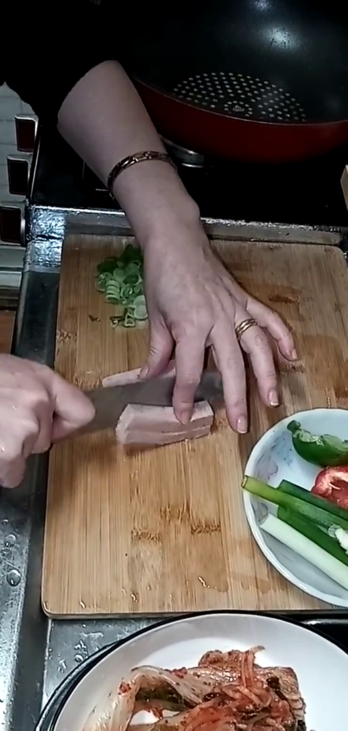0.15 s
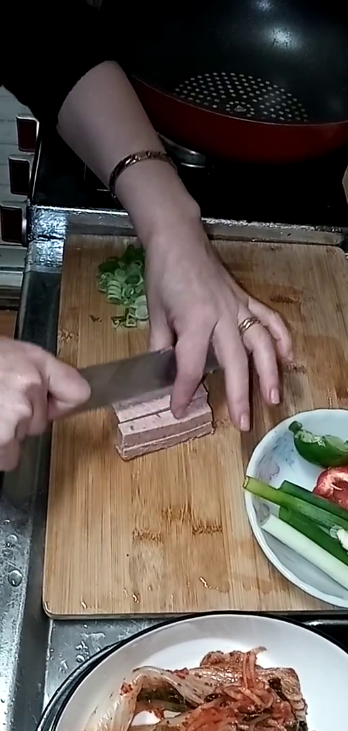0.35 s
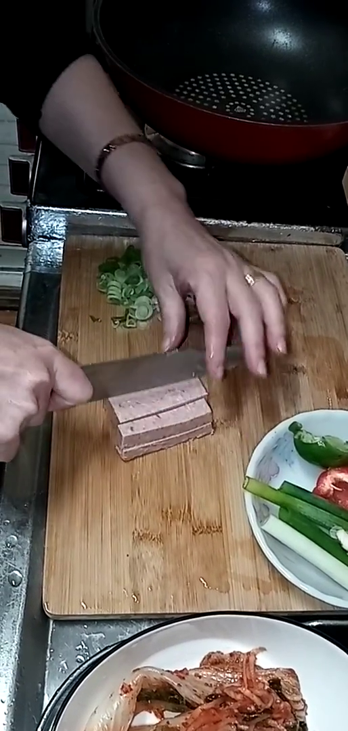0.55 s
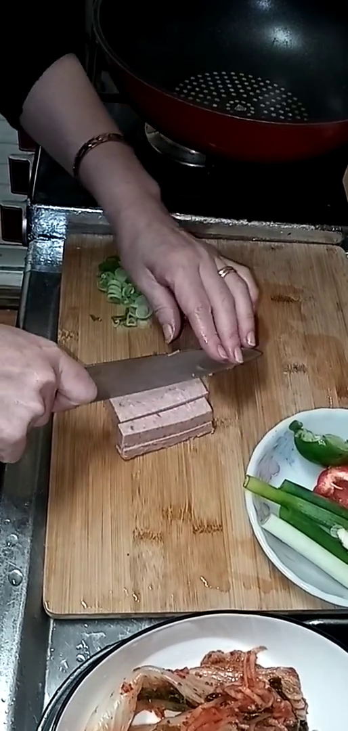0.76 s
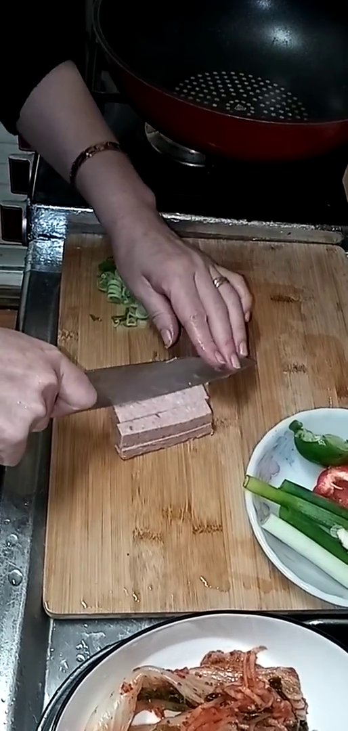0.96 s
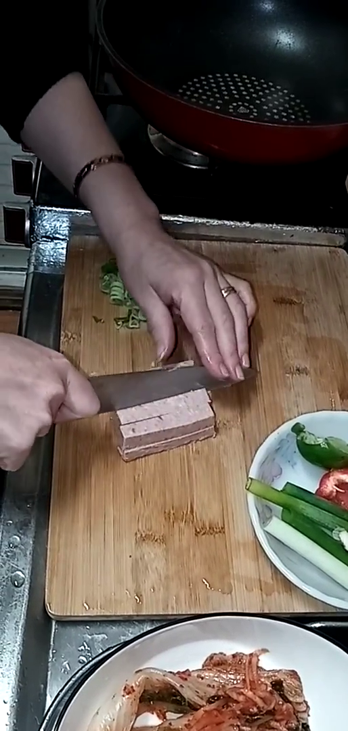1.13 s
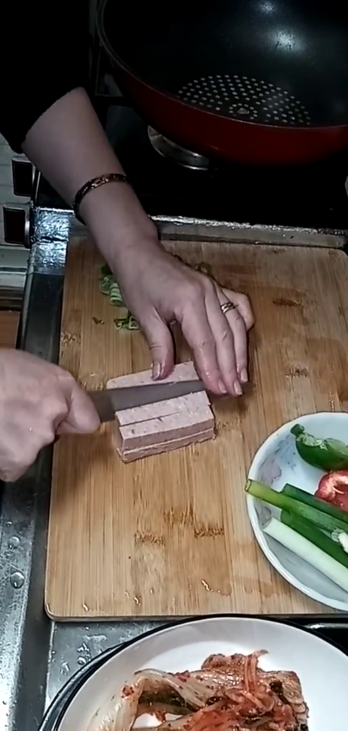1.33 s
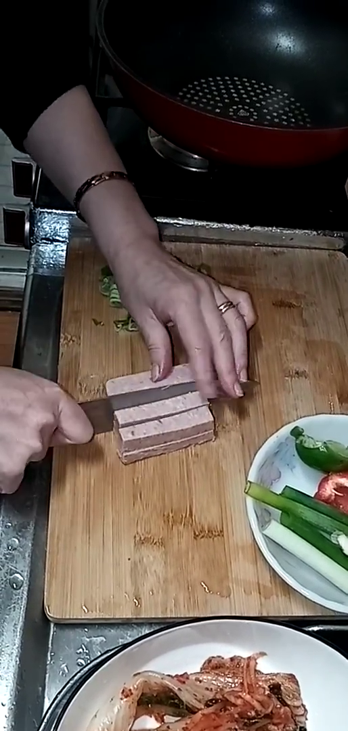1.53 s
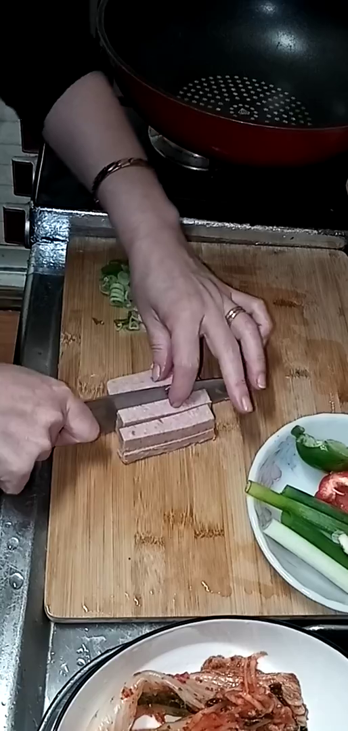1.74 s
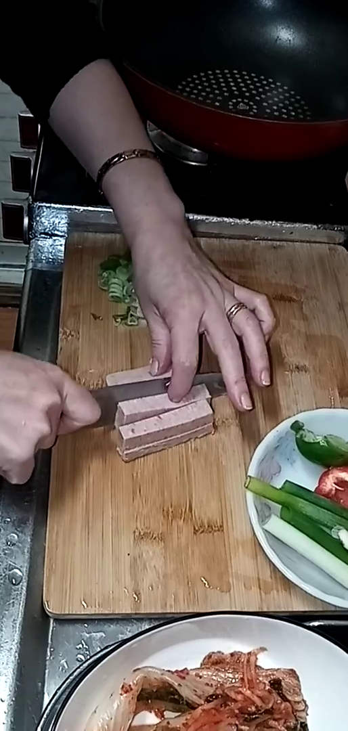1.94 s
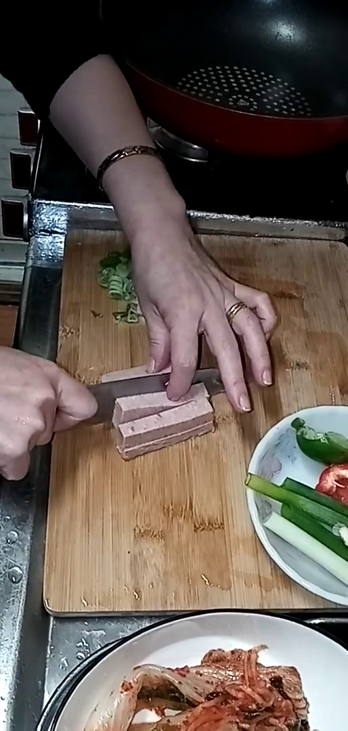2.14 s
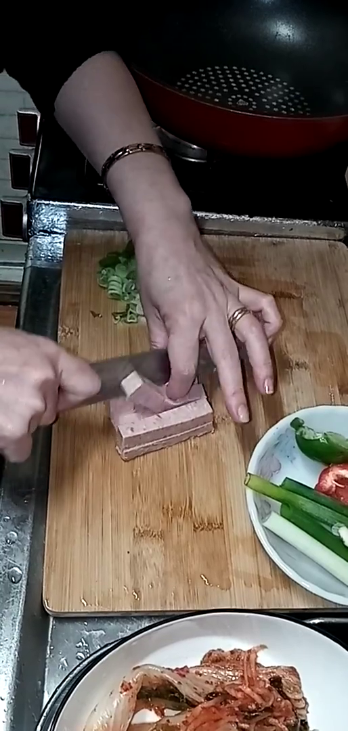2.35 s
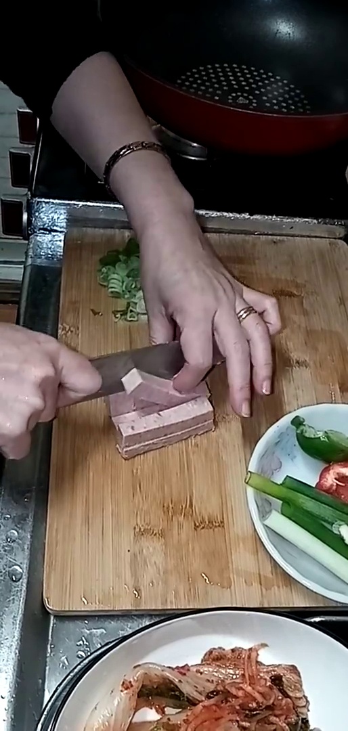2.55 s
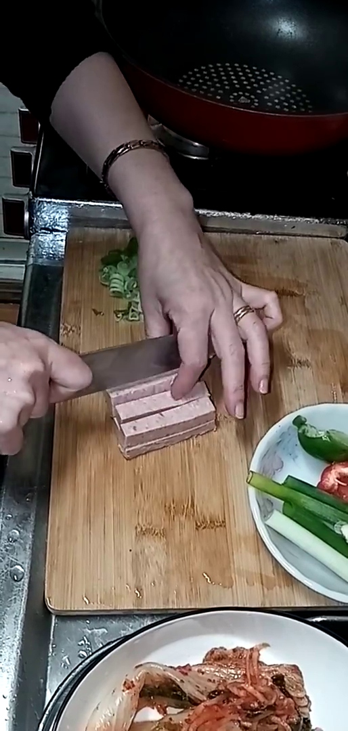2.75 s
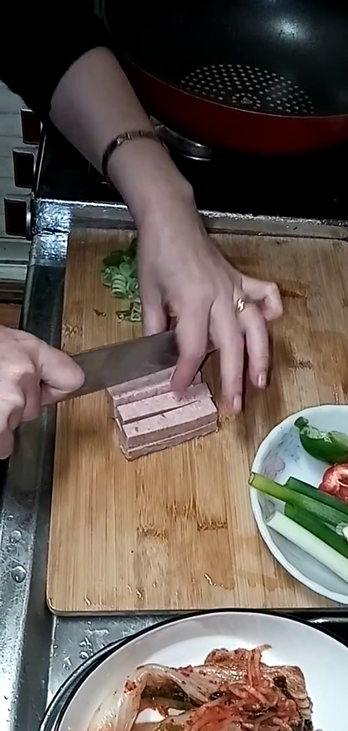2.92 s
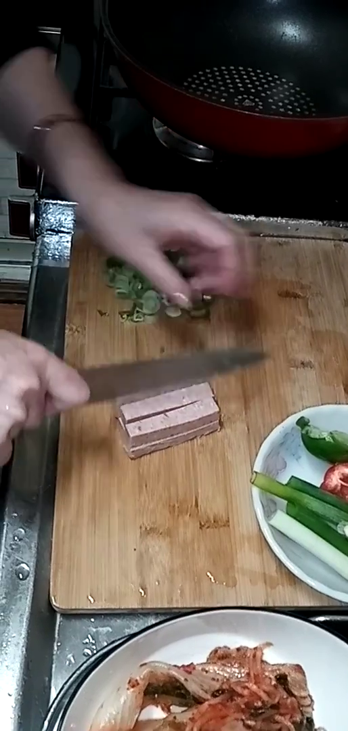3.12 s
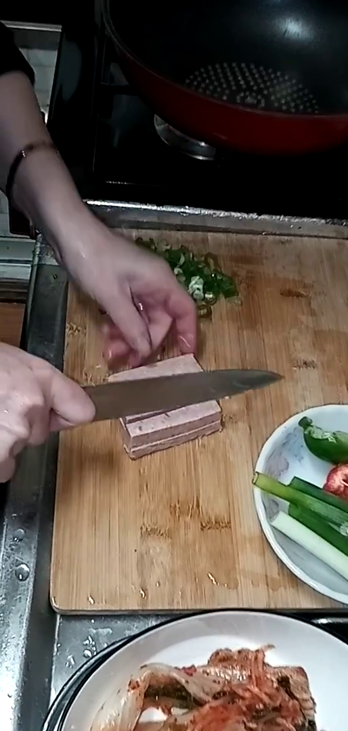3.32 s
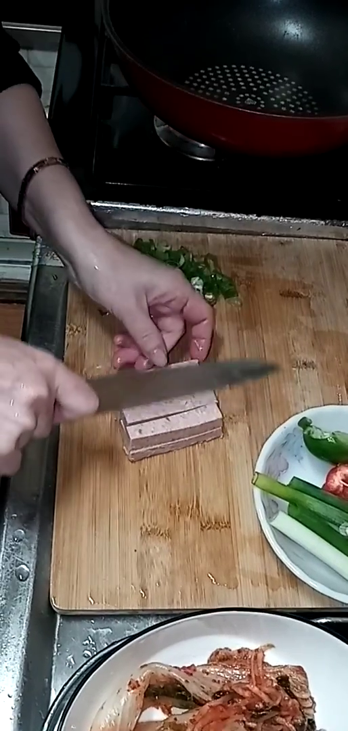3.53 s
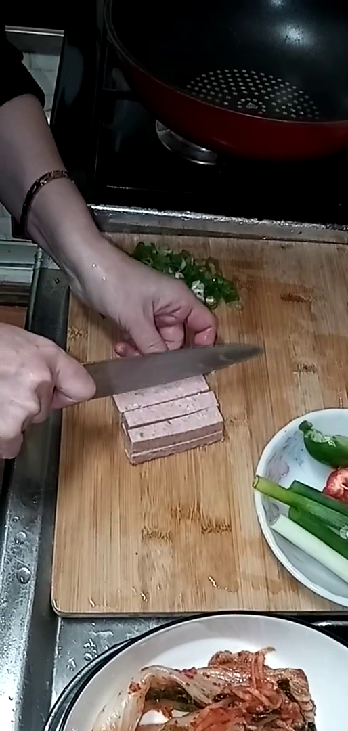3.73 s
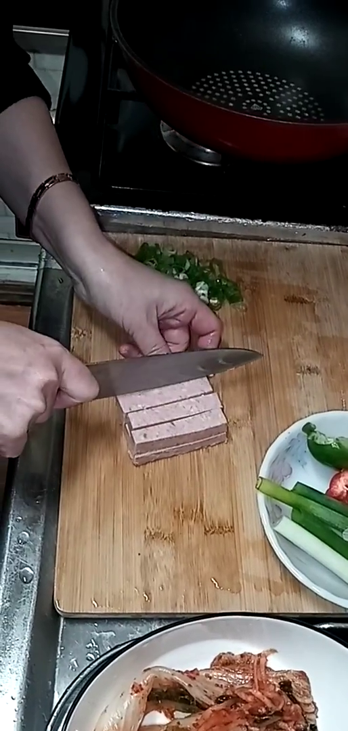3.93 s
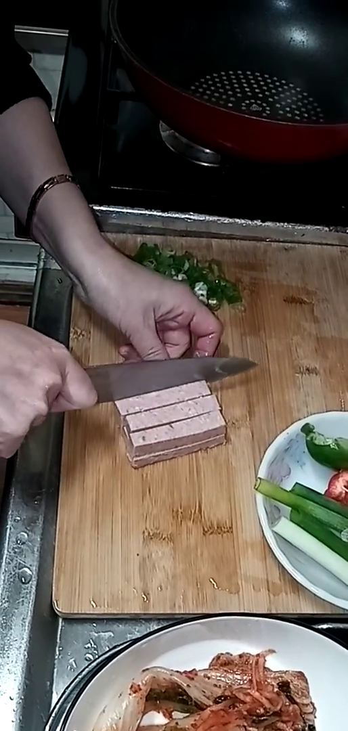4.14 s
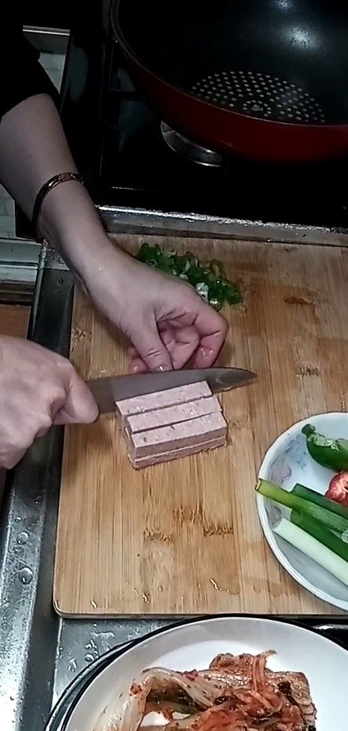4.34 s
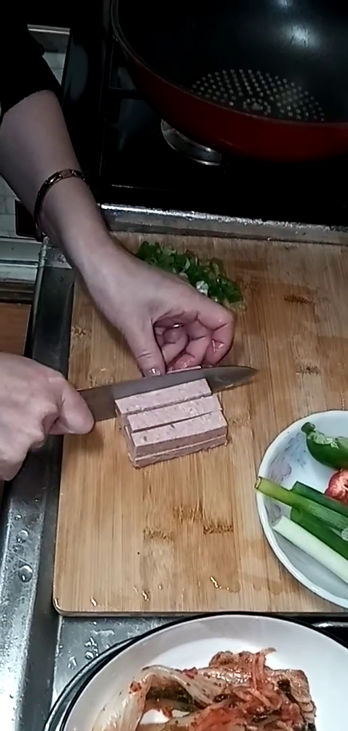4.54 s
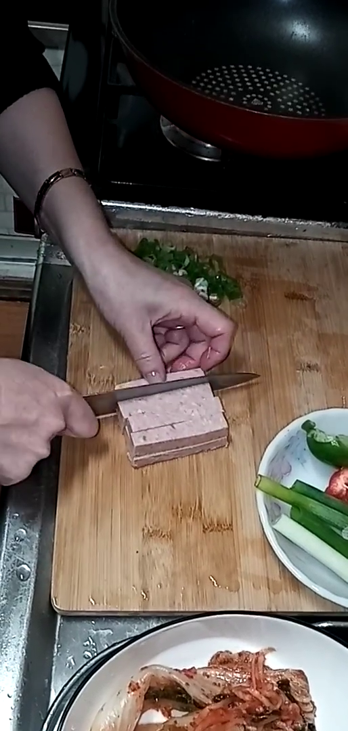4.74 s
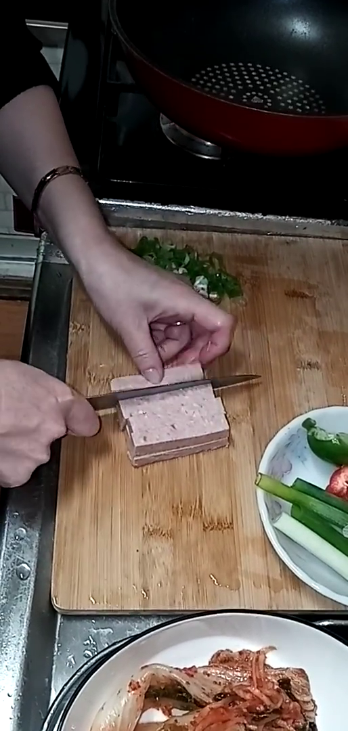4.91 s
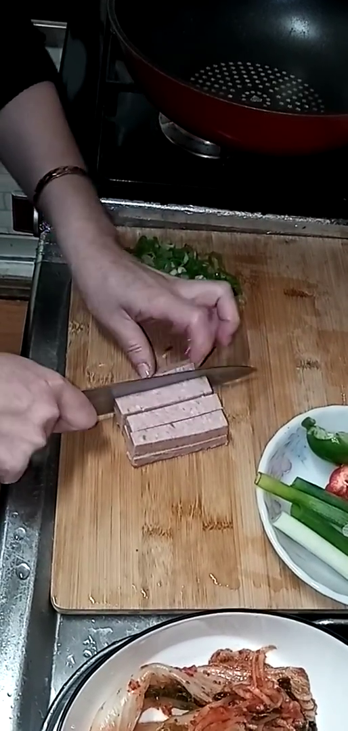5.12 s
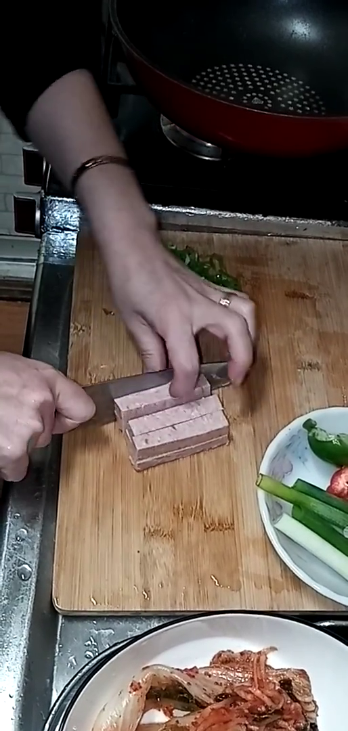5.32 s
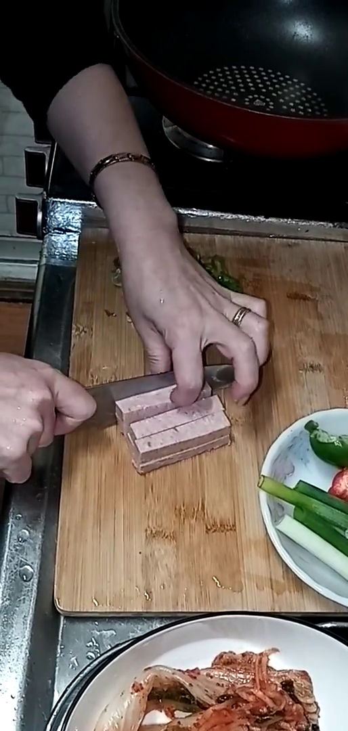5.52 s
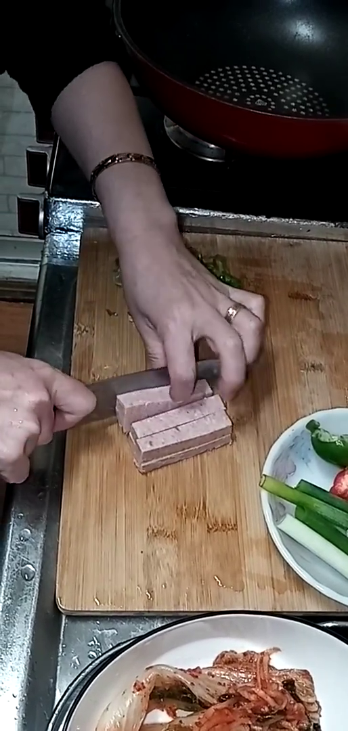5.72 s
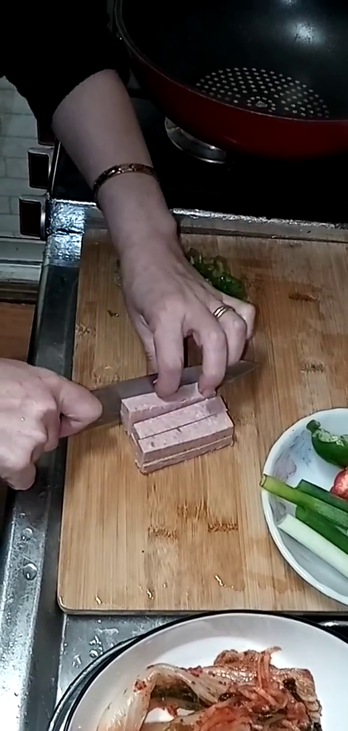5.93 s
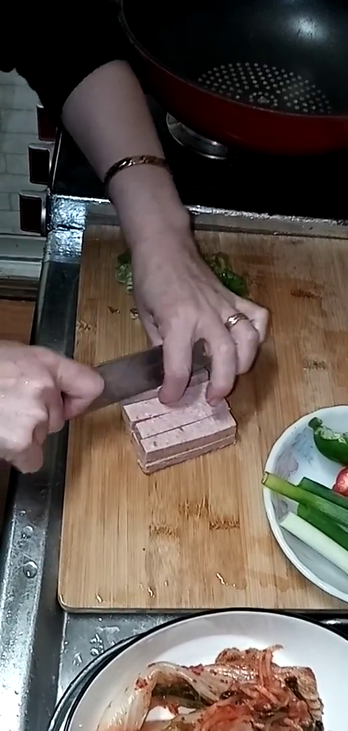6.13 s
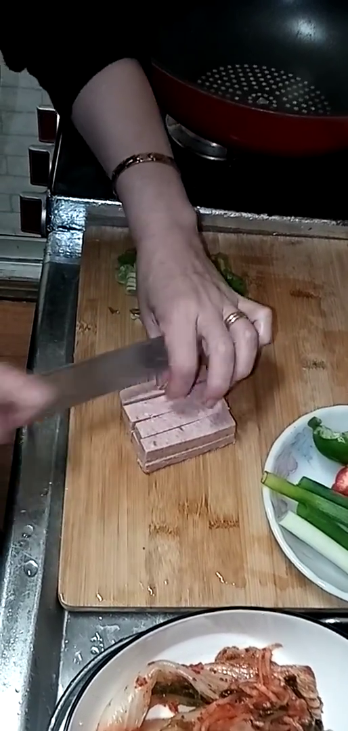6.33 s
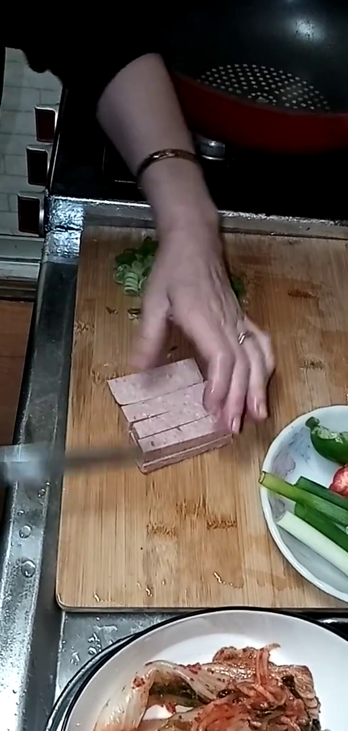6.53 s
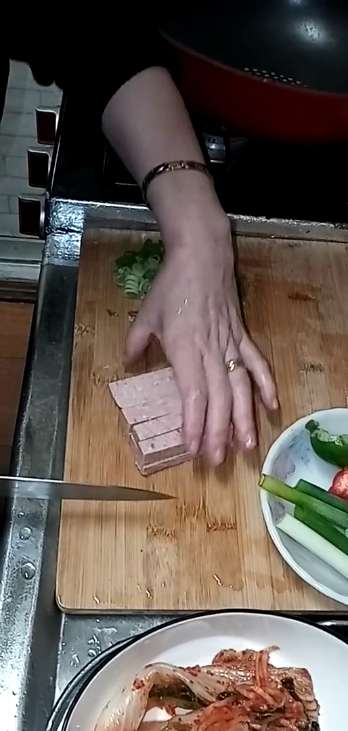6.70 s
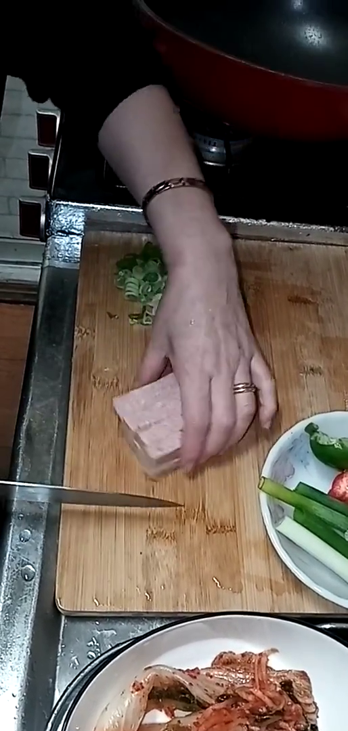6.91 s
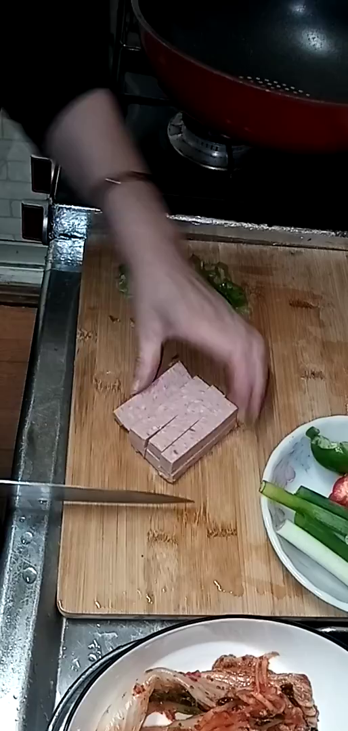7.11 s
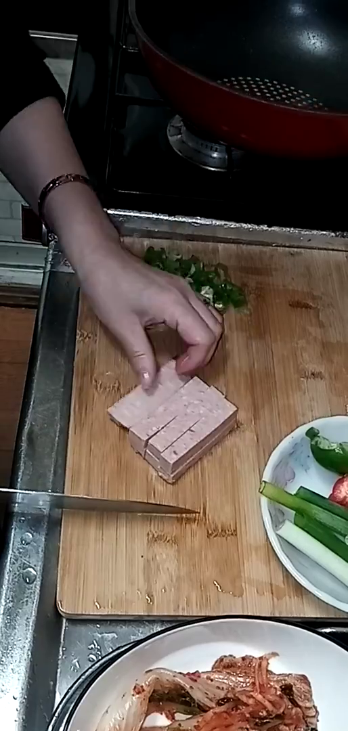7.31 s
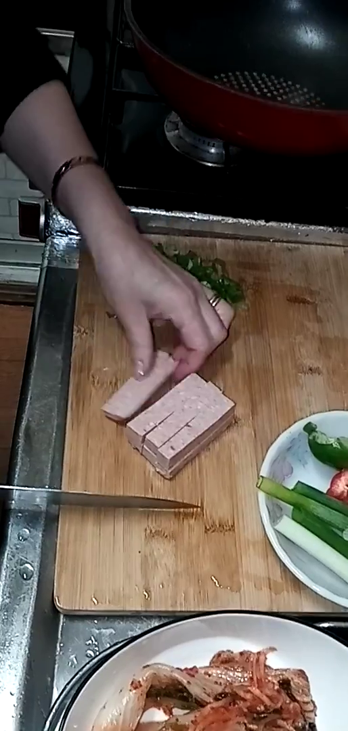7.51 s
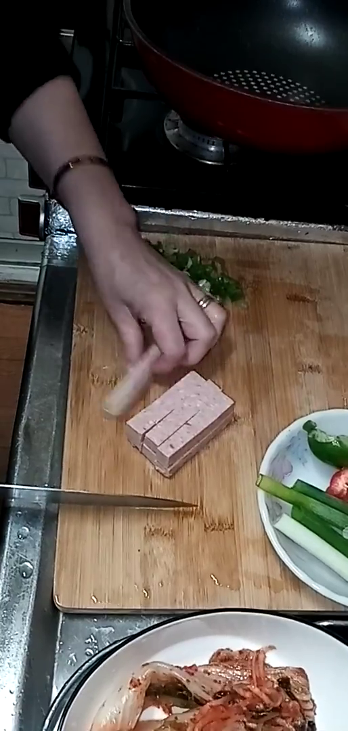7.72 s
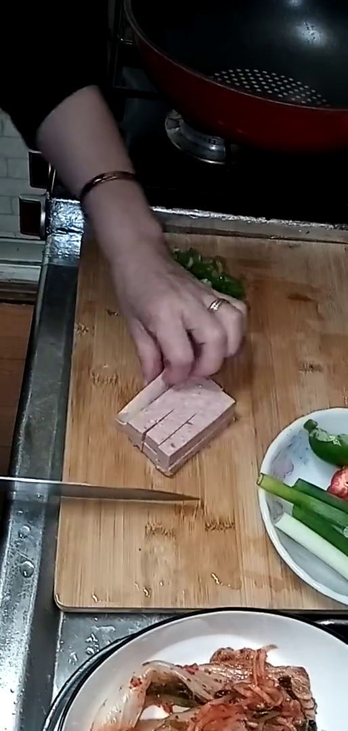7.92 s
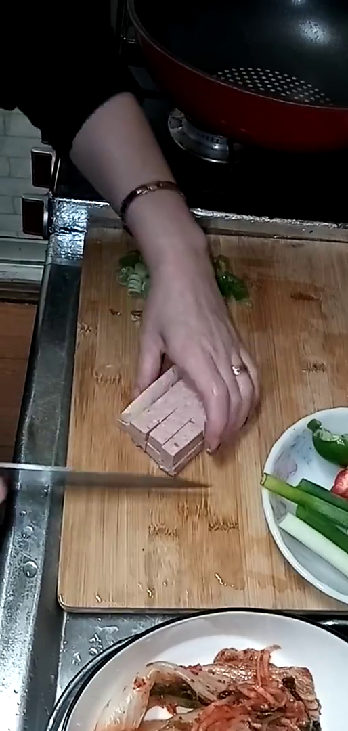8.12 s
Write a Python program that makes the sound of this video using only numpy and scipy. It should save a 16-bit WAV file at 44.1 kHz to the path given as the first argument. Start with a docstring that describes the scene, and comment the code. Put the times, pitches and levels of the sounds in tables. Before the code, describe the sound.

Close in a quiet kitchen, a knife cuts soft meat on a wooden board. Faint thuds and tiny wet clicks lead to a firm knock on wood, a wet snap and another double knock. Later the steel counter is tapped and scraped, the blade rings briefly as it is laid down, and three harder knocks finish. Low background noise, short room tail, a nearby phone microphone.

```python
"""A knife cuts ham on a wooden board on a steel counter in a quiet kitchen, a phone microphone nearby.
Soft meat thuds and faint wet clicks (filtered crackle) come first, over a bed of shaped noise.
Then the blade knocks on the wood (struck modes), wet meat snaps off it, and leaning hands rumble the counter.
Late on, steel is tapped and scraped (slips ringing its modes), the blade rings as it drops flat,
and the hardest knocks end the scene."""
import sys
import numpy as np
from scipy import signal
from scipy.fft import rfft, irfft
from scipy.io import wavfile
from scipy.ndimage import uniform_filter1d

SR = 44100
rng = np.random.default_rng(int(sys.argv[2]) if len(sys.argv) > 2 else 0)


def wav_record(signal):
    """Record a signal, one row per channel, as 16-bit PCM in the file named by sys.argv[1]."""
    frames = np.transpose(np.atleast_2d(signal))
    bounded = np.clip(frames, -1, 1)
    # unit amplitude maps onto the largest positive 16-bit level
    quanta = np.round(bounded * 32767).astype(np.int16)
    wavfile.write(sys.argv[1], SR, quanta)


def volts_from_db(level):
    """Convert decibel levels to linear amplitude ratios."""
    exponent = np.asarray(level, float) / 20
    return 10 ** exponent


N = 364266  # length in samples

# blade on wood: start_s, level_db (9 dB over the rms of the first 11 ms),
# then the modes near 300, 600, 1300 and 2000 Hz against those near 950 Hz: low_db, mid_db, high_db, top_db
KNOCKS = [(1.46, -19.5, 2.5, -2, 1, 4), (1.471, -29.5, -7, 11, -5, 1), (2.766, -50, -5, 14, -13, -15),
          (4.368, -53.5, -10, -9, -7, 19), (4.434, -21, 6.5, -2.5, -9, 1), (4.444, -23.5, 3.5, 13.5, 9, -7),
          (4.573, -42.5, -14, 1, 4, -21), (4.597, -52.5, -25, -3, 10, -7),
          (5.429, -31.5, 6.5, -4, -19, -40), (5.443, -34, 11.5, -0.5, -13, -40),
          (7.272, -14.5, 1.5, -7.5, 1, 5.5), (8.007, -18.5, 4.5, -1.5, 1, 1.5),
          (8.232, -10.5, -3, -5.5, 8, 6)]
# centres of those four mode groups, then of the reference group: centre_hz
KNOCK_HZ = [300, 600, 1300, 2000, 950]
# modes of the board: pitch_hz, relative level_db, t60_s (10 ms at least when struck)
BOARD = [(246, -17, 0.099), (456.9, -14, 0.25), (528, -7.5, 0.17), (651, -0.5, 0.12), (728.5, -11, 0.13),
         (861, 4.5, 0.032), (970.6, 1, 0.04), (1136, -0.5, 0.025), (1232, -5.5, 0.084), (1272, 4, 0.037),
         (1625, -9, 0.048), (1758, 5.5, 0.0081), (2065, -5.5, 0.027), (2797, -28.5, 0.031)]
DETUNE = 0.015  # the pressing hand shifts the modes from blow to blow, as a fraction of pitch
SINK_S = 0.0017  # decay of the contacts as the edge seats itself
SOFT_S = 0.0003  # rise of a 0 dB blow; weaker blows are cushioned by the meat and rise slower


def knocks():
    """The edge seats itself in the wood in a few quick contacts, too softly to excite the treble."""
    out, t = np.zeros(N), np.arange(900) / SR
    for start_s, level_db, *colour_db in KNOCKS:
        modes = thick(BOARD, -1.9, count=36)
        place_db = 2 * rng.standard_normal(len(modes))  # every spot of the board favours other modes
        modes[:, 0] *= 1 + DETUNE * rng.uniform(-1.13, 1, len(modes))
        contacts = 0.035 * rng.standard_normal(len(t)) ** 3 * np.exp(-t / SINK_S)
        contacts[[0, 50]] = 0.3, 3  # a touch, then the firm blow
        body = ring(modes, colour(modes, KNOCK_HZ, colour_db) + place_db)
        rise_s = SOFT_S * volts_from_db(-level_db / 2)
        body *= 1 - np.exp(-np.arange(len(body)) / SR / rise_s)
        knock = signal.fftconvolve(contacts, body)
        add(out, start_s, volts_from_db(level_db) * knock / np.sqrt(8 * np.mean(knock[:500] ** 2)))
    return band(out, 120, 2730, order=4)


# modes of the steel counter top, tapped and dragged on: pitch_hz, relative level_db, t60_s
STEEL = [(624.8, 1, 0.15), (712, -2.5, 0.06), (984, 2.5, 0.066), (1080, -4, 0.078), (1493, -10, 0.052),
         (1745, -10, 0.071), (1958, -6, 0.051), (2060, -6, 0.048), (2507, -20, 0.16), (3337, -24.5, 0.042)]
# taps on steel: start_s, level_db (rms of the first 20 ms),
# then the modes near 620, 2000 and 3000 Hz against those near 1000 Hz: low_db, high_db, top_db,
# and the treble hiss against the modes: sheen_db
TAPS = [(1.556, -47.5, 5.5, 11.5, 0.5, -27), (6.564, -51, -20, -15, -11, -19),
        (6.644, -30, 3, -8, -10, -34), (6.815, -35, -5.5, -11, -4, -25.5), (6.833, -31.5, 2.5, 5, -3, -36),
        (7.047, -35, -1.5, 2, 12, -20), (7.719, -36.5, 2, 13.5, 17, -5.5), (7.728, -41, -4, 14, 11, -5.5)]
# centres of those three mode groups, then of the reference group: centre_hz
TAP_HZ = [620, 2000, 3000, 1000]
CONTACT_S = 0.006  # decay of the contacts in one tap


def taps():
    """Each tap is a short cluster of contacts that rings the steel."""
    out, t = np.zeros(N), np.arange(2000) / SR
    for start_s, level_db, *colour_db, sheen_db in TAPS:
        modes = thick(STEEL, -1.3, count=30)
        modes[:, 0] *= 1 + DETUNE * rng.uniform(-0.81, 1, len(modes))
        body = band(ring(modes, colour(modes, TAP_HZ, colour_db)), 457, 3500, order=3)
        add(body, 0, volts_from_db(sheen_db) * np.linalg.norm(body) * sheen())
        contacts = rng.standard_normal(len(t)) ** 3 * np.exp(-t / CONTACT_S)
        contacts[0] = 32  # the first contact is firm
        tap = signal.fftconvolve(contacts, body)
        add(out, start_s, volts_from_db(level_db) * tap / np.sqrt(np.mean(tap[:900] ** 2)))
    return out


# dragging and chatter on steel, one curve a stroke: time_s, ring_db, rasp_db,
# low_db (modes up to 700 Hz against those from 950 Hz up)
DRAG = [
    [(6.574, -34, -54, -2), (6.6, -37, -48, -1), (6.628, -31, -45, -15), (6.66, -48, -56, -2.5),
     (6.72, -42, -50.5, 2), (6.75, -45, -57, -11), (6.81, -43.5, -54, -4), (6.87, -54.5, -90, 0.5),
     (6.95, -74, -98, 3)],
    [(7.055, -39.5, -75, -6.5), (7.11, -51, -57, -5.5), (7.18, -48, -59, -1.5), (7.27, -55.5, -72, -3),
     (7.34, -52, -76, 0), (7.4, -55, -69, 3), (7.58, -65, -78, 12), (7.65, -98, -97, 0)],
    [(8.03, -67, -96, 5), (8.1, -51, -80, -8), (8.16, -62, -68.5, -13), (8.21, -61, -99, 1)],
]
# one thin line of the blade sings along in each stroke: pitch_hz, sing_db (against the ring)
SING = [(1780, -21.5), (3750, -26), (2506, -11.5)]
WANDER = 0.012  # the sliding weight shifts the steel's modes from spot to spot, as a fraction of pitch
SPOT_DB = 3.5  # spread of the modes' levels from spot to spot


def drag():
    """Uneven slips ring the low modes of the steel and scratch in its treble; the contact wanders."""
    out, modes = np.zeros(N), thick(STEEL, -8.5, count=30)
    for rows, (sing_hz, sing_db) in zip(DRAG, SING):
        start_s, ends, (ring_db, rasp_db, low_db) = span(rows)
        n = len(ends)
        size_db = 3 * np.minimum(rng.exponential(1, n), 4)
        size_db += 3 * evened(uniform_filter1d(rng.standard_normal(n), 300))  # clumped contact
        is_slip = rng.random(n) < 3000 / SR  # about 3000 slips a second
        slips = ends * evened(rng.standard_normal(n) * volts_from_db(size_db) * is_slip)
        song = np.sqrt(SR / 60) * resonate(slips * volts_from_db(ring_db), sing_hz, 35)  # make-up for the narrow filter
        add(out, start_s, volts_from_db(sing_db) * song)
        spot = np.arange(n) // 1100  # a new spot about every 25 ms
        for k in range(spot[-1] + 1):
            on_spot = spot == k
            lean_db = colour(modes, [700, 950], [low_db[on_spot].mean()])
            bent = modes * (1 + WANDER * rng.uniform(-1.04, 1, (len(modes), 1)) * [1, 0, 0])
            spot_db = SPOT_DB * rng.standard_normal(len(modes))
            body = band(ring(bent, lean_db + spot_db)[:8192], 380, 4200, order=3)
            here = slips[on_spot]
            sound = signal.fftconvolve(here * volts_from_db(ring_db[on_spot]), body / np.linalg.norm(body))
            sound += signal.fftconvolve(here * volts_from_db(rasp_db[on_spot]), sheen())
            add(out, start_s + np.argmax(on_spot) / SR, sound)
    return out


# colour of the steel's dense treble modes: freq_hz, level_db
SHEEN = [(800, -26.5), (2200, 5), (3300, 2.5), (4300, -5), (5500, -1), (7000, -2), (8500, -19.5),
         (10500, -30.5), (12500, -72)]


def sheen():
    """The sheet's treble modes lie so close that a blow is a short hiss with faint lines; energy 1."""
    t, f = np.arange(8192) / SR, np.fft.rfftfreq(8192, 1 / SR)
    lines_db = 3 * evened(uniform_filter1d(rng.standard_normal(len(f)), 18))
    fade = volts_from_db(-60 * t / 0.036) + 0.032 * volts_from_db(-60 * t / 0.49)  # a quick decay with a faint long tail
    fade *= 1 - np.exp(-t / 0.0016)
    hiss = irfft(rfft(rng.standard_normal(len(t))) * volts_from_db(read(SHEEN, f) + lines_db)) * fade
    return hiss / np.linalg.norm(hiss)


# thin lines of the knife's own ring as it drops flat: pitch_hz, relative level_db, t60_s
BLADE = [(1346, 1, .17), (1986, 2, .3), (2541, -7, .25), (3025, 0, .26)]
BLADE_S, BLADE_DB = 6.835, -33.5  # start, and level ahead of its soft onset


def blade():
    """The flat of the knife rings in a few thin modes with a soft onset."""
    out = np.zeros(N)
    y = ring(BLADE, np.zeros(len(BLADE)))
    add(out, BLADE_S, volts_from_db(BLADE_DB) * y * (1 - np.exp(-np.arange(len(y)) / SR / 0.0049)))
    return out


# wet meat clicking off blade, fingers and board: start_s, level_db (of the crackle as its decay begins),
# centre_hz (ahead of the microphone colour), width_octaves (7 dB down to either side), t60_s
SMACKS = [(0.049, -73, 5900, 0.17, 0.45), (0.496, -68, 3570, 1.1, 0.17), (1.568, -68, 7440, 1.3, 0.11),
          (2.364, -67.5, 10600, 0.63, 0.1), (2.446, -66.5, 4400, 0.69, 0.32),
          (2.764, -53.5, 2600, 0.3, 0.058), (3.284, -43.5, 3900, 1.17, 0.089),
          (4.959, -70.5, 9400, 1.7, 0.13), (6.125, -66, 8000, 1.6, 0.28)]
SNAP_RISE_S = 0.0015


def smacks():
    """Wet surfaces part with a snap and a spray of finer crackle behind it."""
    out = np.zeros(N)
    for start_s, level_db, centre_hz, width_octaves, t60_s in SMACKS:
        add(out, start_s, volts_from_db(level_db) * crackle(centre_hz, width_octaves, t60_s, SNAP_RISE_S))
    return out


# a short rubbing hiss after two of the cuts: start_s, level_db (as its decay begins), t60_s, rise_s
RUBS = [(1.468, -47.5, 0.22, 0.012), (4.453, -58, 0.41, 0.018)]
RUB_HZ, RUB_OCTAVES = 2840, 0.67  # centre and width


def rubs():
    """Rubbing is the same wet crackle with a slower rise."""
    out = np.zeros(N)
    for start_s, level_db, t60_s, rise_s in RUBS:
        add(out, start_s, volts_from_db(level_db) * crackle(RUB_HZ, RUB_OCTAVES, t60_s, rise_s))
    return out


# microphone colour on the wet sounds: freq_hz, level_db
MIC = [(1000, -11.5), (2200, 11), (4500, -13), (6500, 1.5), (8500, -9), (16000, -17.5)]


def crackle(centre_hz, width_octaves, t60_s, rise_s):
    """Noise in uneven pops around one frequency, stronger in its first moments, dying away."""
    t, f = np.arange(16384) / SR, np.fft.rfftfreq(16384, 1 / SR) + 1
    shade = volts_from_db(read(MIC, f) - 7 * (np.log2(f / centre_hz) / width_octaves) ** 2)
    pops_db = 4 * evened(uniform_filter1d(rng.exponential(1, len(t)) ** 3, size=130))
    pops = evened(irfft(rfft(rng.standard_normal(len(t)) * volts_from_db(pops_db)) * shade))
    snap = 1 + 5 * np.exp(-t / 0.0012)
    return pops * volts_from_db(-60 * t / t60_s) * (1 - np.exp(-t / rise_s)) * snap


# soft thuds of the meat on the board: top_s, level_db, swell_s, fade_s (20 dB each)
THUDS = [(.03, -62.5, 0.041, 0.072), (2.424, -58.5, 0.042, 0.056), (2.785, -57.5, 0.018, 0.035),
         (4.285, -62.5, .03, 0.07), (6.67, -45.5, 0.089, 0.13)]


def thuds():
    """Soft meat gives a dull lumpy push with no ring: broad noise around 290 Hz."""
    lump = steadied(resonate(resonate(rng.standard_normal(N), 290, 320), 290, 320))
    return band(sum(bump(*row) for row in THUDS) * lump, 67, 900, order=2)


# shakes of the counter: top_s, level_db, swell_s, fade_s (20 dB each), thump_share (power of the thump, 0-1)
SHAKES = [(1.489, -48.5, 0.03, 0.1, 0.9), (2.45, -54.5, .07, 0.051, 0.63), (2.799, -51, 0.068, 0.046, 0.9),
          (3.18, -61.5, 0.17, 0.2, 0.03), (3.8, -59, 0.14, 0.17, 0), (3.94, -62, 0.085, 0.12, 0.02),
          (4.11, -60.5, 0.13, .08, 0), (4.48, -55, 0.073, 0.2, 0.15), (4.75, -61.5, 0.089, 0.16, 0),
          (5.72, -62, 0.085, 0.052, 0), (6.679, -39.5, 0.075, 0.1, 0.06), (7.291, -52.5, 0.027, 0.054, 0.2),
          (7.52, -61.5, 0.18, 0.065, 0), (7.79, -61, 0.12, 0.11, 0), (8.03, -53, 0.031, 0.025, 0.5),
          (8.2, -55.5, 0.048, 0.072, 1), (8.25, -47, 0.025, .1, 0.5)]
STIR_DB = -78.5  # the counter never rests quite


def rumble():
    """Leaning, pushing and blows shake the counter's lowest mode, with a duller thump below it."""
    push = rng.standard_normal(N)
    mode = steadied(resonate(resonate(push, 119.3, 14), 109.0, 88))
    thump = steadied(resonate(resonate(push, 90, 90), 90, 90))
    power = np.array([bump(*row[:4]) for row in SHAKES]) ** 2
    thump_share = np.transpose(SHAKES)[4]
    mode_gain = np.sqrt((1 - thump_share) @ power + volts_from_db(STIR_DB) ** 2)
    thump_gain = np.sqrt(thump_share @ power)
    return band(mode_gain * mode + thump_gain * thump, 61, 420, order=2)


# the kitchen's tail: freq_hz, t60_s
ROOM = [(150, 0.42), (600, 0.26), (2000, 0.18)]


def kitchen(x):
    """Sparse echoes of random sign, one in every 20 samples, each band dying at its own speed."""
    echoes, at = np.zeros(SR), np.arange(200, SR - 20, 20)
    echoes[at + rng.integers(0, 20, len(at))] = rng.choice([-1., 1.], len(at))
    hz, t, z = signal.stft(echoes, SR, nperseg=256)
    decay = volts_from_db(-60 * t / read(ROOM, hz)[:, None])
    tail = signal.istft(z * decay, SR, nperseg=256)[1]
    return signal.fftconvolve(x, tail / np.linalg.norm(tail))[:N]


# colour of the background: freq_hz, relative level_db
AIR = [(25, -38), (92, -5), (257, -9), (636, -7.5), (1390, -9.5), (1770, -8.5), (3050, -19), (3900, -27),
       (4600, -34.5), (6500, -22), (8000, -32.5), (16000, -33.5)]
AIR_DB = -69  # rms of the background noise
# a faint fuzzy band in the background: centre_hz, width_hz, level_db
WHIRR = [(1405, 48, -78)]


def air():
    """Shaped background noise whose short-time spectrum varies at random, and a faint fuzzy band."""
    frames, hz = N // 256 + 5, np.fft.rfftfreq(1024, 1 / SR)
    a, b, broad, fine = rng.standard_normal((frames, 513, 4)).T  # each is frequency by time
    fine = evened(uniform_filter1d(uniform_filter1d(fine, 3, axis=0), 10, axis=1))
    broad = evened(uniform_filter1d(uniform_filter1d(broad, 14, axis=0), 12, axis=1))
    vary_db = 3 * fine + 1.3 * broad
    z = (a + 1j * b) * volts_from_db(read(AIR, hz)[:, None] + vary_db)
    out = volts_from_db(AIR_DB) * evened(signal.istft(z, nperseg=1024, noverlap=768)[1][:N])
    for centre_hz, width_hz, level_db in WHIRR:
        out += volts_from_db(level_db) * evened(resonate(rng.standard_normal(N), centre_hz, width_hz))
    return out


def ring(modes, colour_db):
    """All modes struck at once, each swelling over its first cycle, weighted by colour_db; peak 1."""
    hz, db, t60 = np.transpose(modes)[:, :, None]
    t = np.arange(SR // 3) / SR
    sign = (-1) ** np.arange(len(modes))[:, None]  # neighbouring modes move the air in opposite senses
    decay = volts_from_db(db + colour_db[:, None] - 60 * t / np.maximum(t60, 0.01))
    swell = 1 - np.exp(-2 * hz * t)
    y = (sign * decay * swell * np.sin(2 * np.pi * hz * t)).sum(0)
    return y / abs(y).max()


def thick(modes, weak_db, count):
    """Adds weak modes at random between the strong ones."""
    f, db, t60 = np.transpose(modes)
    hz = np.sort(rng.uniform(f[0], f[-1], count))
    level_db = np.interp(hz, f, db) + weak_db + 3 * rng.standard_normal(count)
    return np.vstack([modes, np.transpose([hz, level_db, 0.75 * np.interp(hz, f, t60)])])


def colour(modes, at_hz, db):
    """Gain of each mode for one blow in dB, 0 dB at the last reference frequency."""
    return read(sorted(zip(at_hz, [*db, 0])), np.transpose(modes)[0])


def resonate(x, hz, width):
    """One resonance of gain 1, fixed or moving, its width in Hz."""
    turn = np.exp(2j * np.pi * np.cumsum(hz * np.ones(len(x))) / SR)
    r = np.exp(-np.pi * width / SR)
    return 2 * (turn * signal.lfilter([1 - r], [1, -r], x / turn)).real


def steadied(x):
    """Narrow noise with its deepest fades partly filled, as from a continuous push; rms 1."""
    return evened(x / np.sqrt(abs(signal.hilbert(x)) + 0.1 * x.std()))


def bump(top_s, level_db, swell_s, fade_s):
    """Gain that climbs 20 dB in swell_s up to its top and drops 20 dB in fade_s after it."""
    t = np.arange(N) / SR - top_s
    return volts_from_db(level_db - 20 * np.maximum(-t / swell_s, t / fade_s))


def span(rows):
    """Start time, soft ends, and the columns of a curve sample by sample."""
    s, *columns = np.transpose(rows)
    t = np.arange(s[0], s[-1], 1 / SR)
    return s[0], signal.windows.tukey(len(t), 400 / len(t)), [np.interp(t, s, c) for c in columns]


def band(x, lo_hz, hi_hz, order):
    """Band-pass filter."""
    return signal.sosfilt(signal.butter(order, [lo_hz, hi_hz], "band", fs=SR, output="sos"), x)


def evened(x):
    """Scales to rms 1."""
    return x / np.sqrt(np.mean(x ** 2) + 1e-20)


def read(points, hz):
    """Reads a table along a log-frequency axis."""
    f, value = np.transpose(points)
    return np.interp(np.log(hz + 1), np.log(f + 1), value)


def add(mix, s, sound):
    """Mixes a sound in at s seconds."""
    part = mix[round(s * SR):][:len(sound)]
    part += sound[:len(part)]


def scene():
    """Close sounds, their tail in the kitchen, and the background."""
    wood = knocks()
    steel = taps() + drag() + blade()
    wet = smacks() + rubs()
    tail = kitchen(volts_from_db(-7.5) * wood + volts_from_db(-4.0) * steel + volts_from_db(-7.0) * wet)
    return (wood + steel + wet + tail + thuds() + rumble() + air())[None]


def top_cut(x):
    """Nothing passes above the cut-off."""
    return signal.sosfilt(signal.butter(12, 15720, fs=SR, output="sos"), x)


def record(dry):
    """Delivers the finished mix."""
    return top_cut(dry)


dry = scene()
out = record(dry)
wav_record(out)
```